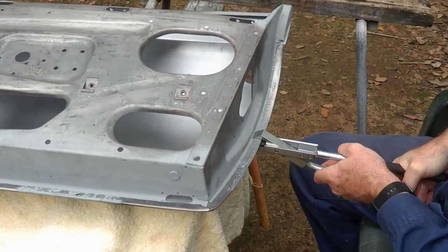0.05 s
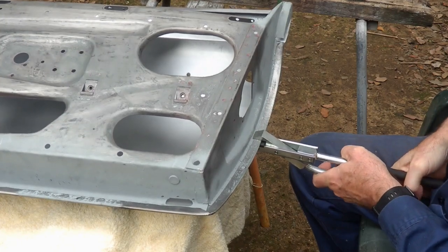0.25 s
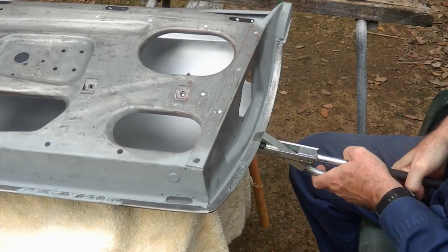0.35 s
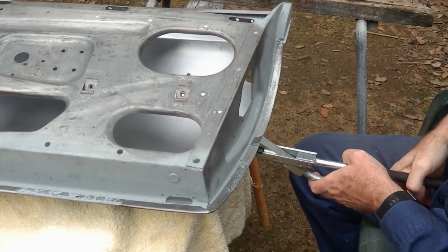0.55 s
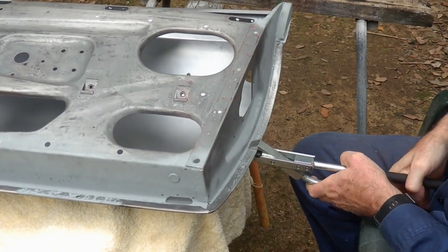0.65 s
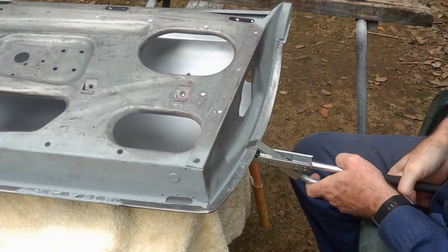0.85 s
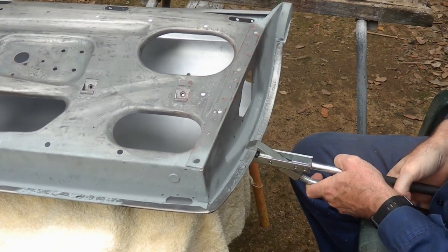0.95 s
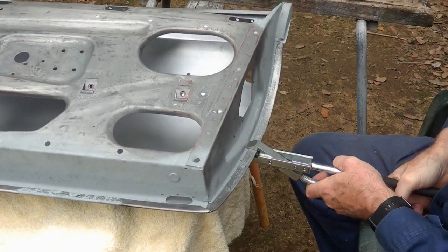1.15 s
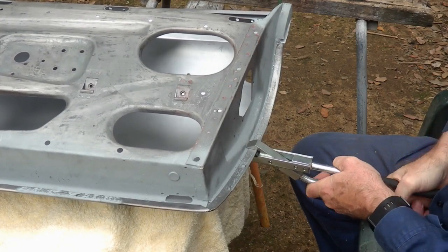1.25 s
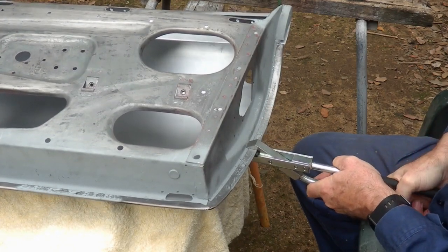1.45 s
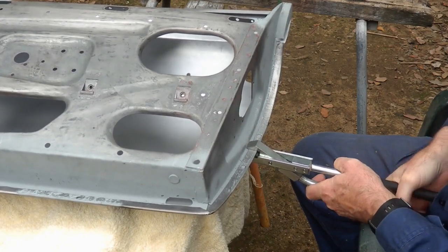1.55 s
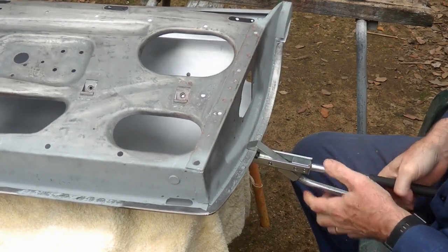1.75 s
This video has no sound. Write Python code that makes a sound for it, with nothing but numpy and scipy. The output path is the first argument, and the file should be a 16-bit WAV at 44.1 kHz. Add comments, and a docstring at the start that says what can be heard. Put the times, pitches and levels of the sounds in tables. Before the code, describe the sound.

Hollow sheet metal creaks, knocks and rings under gripping jaws, ending in a sharp clank and click

```python
"""A hand flanging tool is squeezed on the edge of a steel car door.
The edge yields in stick-slip jerks: each one knocks the flange and rings the hollow panel's modes, mostly ever harder.
The jaws scrape in tiny noisy slips, then snap off with a clank and the tool clicks open; the door booms softly.
Behind it lie a low outdoor rumble, a faint hiss and a thin high whine, made of noise bands and one sine."""
import sys
import numpy as np
from scipy import signal
from scipy.fft import rfft, irfft, next_fast_len
from scipy.io import wavfile

SR = 44100
rng = np.random.default_rng(int(sys.argv[2]) if len(sys.argv) > 2 else 0)


def dump_mix(stems):
    """Bounce the given channels to the path in sys.argv[1] as a 16-bit WAV at rate SR."""
    frames = np.atleast_2d(stems).T  # one column per channel
    limited = np.clip(frames, -1, 1)  # hard clip at full scale
    pcm = np.round(limited * 32767).astype(np.int16)
    wavfile.write(sys.argv[1], SR, pcm)


N = 79380
T = np.arange(N) / SR  # time in seconds


def undb(db):
    """Turn decibels into gain."""
    return 10 ** (np.asarray(db) / 20)


def unit(x):
    """Scale to an rms of 1."""
    return x / np.sqrt(np.mean(x ** 2))


def at(table, hz, axis=1):
    """Read one column of a table between its rows, on a log-frequency axis."""
    rows = np.array(table, float)
    return np.interp(np.log(hz), np.log(rows[:, 0]), rows[:, axis])


def pan(db):
    """Left and right gains for a left-minus-right level difference."""
    gains = np.array([[undb(db / 2)], [undb(-db / 2)]])
    return unit(gains)


def fade(age, t60, rise):
    """Quick rise, then a decay of 60 dB in t60 seconds; silent before age 0."""
    age = np.maximum(age, 0)
    return (1 - np.exp(-age / rise)) * np.exp(-np.log(1000) * age / t60)


def bump(hz, octaves):
    """Spectrum of one broad resonance; its gain is halved this many octaves away."""
    freqs = np.maximum(np.fft.rfftfreq(N, 1 / SR), 1)
    return 1 / (1 + (np.log2(freqs / hz) / octaves) ** 2)


BANDS_HZ = 22 * 2 ** (np.arange(39) / 4)  # band centres, four per octave
CLUSTER_HZ = 17  # spacing of the random peaks and dips in an uneven spectrum


def bands(stereo, grains=1, uneven_db=0):
    """Split stereo noise into bands, each with its own width and balance, optionally bunched into peaks."""
    size = next_fast_len(N)
    freqs = np.maximum(np.fft.rfftfreq(size, 1 / SR), 1)
    peaks = np.interp(freqs / CLUSTER_HZ, np.arange(2048), rng.uniform(-1, 1, size=2048))
    noise = rng.standard_normal((2, N)) * grains
    spectra = rfft(noise, size) * undb(uneven_db * np.sqrt(3) * peaks)
    for hz in BANDS_HZ:
        # neighbouring bands overlap and cross-fade in power
        distance = np.minimum(abs(np.log2(freqs / hz)) * 4, 1)
        mid, side = irfft(spectra * np.sqrt(1 - distance), size)[:, :N]
        side = side * undb(at(stereo, hz))
        left_right = np.array([mid + side, mid - side])
        yield hz, unit(left_right) * pan(at(stereo, hz, axis=2))


# How loud the surroundings are from low to high pitch.
# Each row: frequency in Hz, level in dB per band before the wavering.
AIR_LEVELS = [(22, -102), (40, -67.5), (58, -63), (80, -66.5), (115, -58.5), (200, -66), (320, -73.5),
              (600, -70.5), (1200, -78.5), (2400, -87), (3700, -95), (5000, -83), (6800, -73), (10000, -72),
              (15000, -67.5)]
# How wide the surroundings sound.
# Each row: frequency in Hz, side level against the middle in dB, left minus right in dB.
AIR_STEREO = [(58.6, -16, 1.7), (560, -6, 1.5), (2460, 2, 0), (7500, 4, 0.8), (14000, -10, 0)]
AIR_WAVER_DB = 4.26  # typical wavering at the lowest pitches
WHINE_HZ, WHINE_DB = 15735, -71


def background():
    """Noise bands make a wavering low rumble and a steadier hiss; a sine adds a thin high whine."""
    out = np.zeros((2, N))
    knots = np.linspace(0, T[-1], 20)
    for hz, noise in bands(AIR_STEREO):
        depth_db = AIR_WAVER_DB / (1 + hz / 2000)  # high bands waver less
        waver_db = np.interp(T, knots, rng.standard_normal(len(knots))) * depth_db
        out += noise * undb(at(AIR_LEVELS, hz) + waver_db)
    whine = np.sqrt(2) * np.sin(2 * np.pi * WHINE_HZ * T)
    return out + undb(WHINE_DB) * whine


# Low booming of the door as it flexes under the tool.
# Each row: time in seconds, level in dB.
FLEX_LEVELS = [(0, -42.5), (.18, -113), (.3, -52), (.45, -57), (.58, -48), (.8, -44), (1.0, -55.5),
               (1.2, -54.5), (1.4, -79), (1.55, -62), (1.68, -52.5), (1.8, -44)]
FLEX_HZ, FLEX_OCTAVES = 264.5, 0.5


def flexing():
    """The hollow door booms softly as the tool levers against it: noise through a low resonance."""
    spectrum = rfft(rng.standard_normal(N)) * bump(FLEX_HZ, FLEX_OCTAVES) ** 2
    boom = unit(irfft(spectrum, N))
    level_db = np.interp(T, *np.array(FLEX_LEVELS).T)
    return boom * undb(level_db) * pan(db=2.6)


# How hard the jaws rub on the edge.
# Each row: time in seconds, pressure in dB.
RUB_PRESSURE = [(0, -11.5), (.18, -7), (.25, 3.5), (.32, -4), (.41, 1), (.52, -1.5), (.62, 2.5), (.74, 6),
                (.8, -0.5), (.95, -2), (1.08, -13), (1.55, -14), (1.7, -5.5), (1.8, 1)]
# Colour of the rubbing.
# Each row: frequency in Hz, level in dB per band before the pressure is added.
RUB_COLOUR = [(100, -67), (280, -60), (700, -63.5), (1300, -74.5), (3500, -82), (5500, -76.5), (7600, -65),
              (10500, -78.5), (15000, -83)]
# How wide the rubbing, and later the ringing panel, sound.
# Each row: frequency in Hz, side level against the middle in dB, left minus right in dB.
PANEL_STEREO = [(98, -20, 2.1), (570, -20, 0.9), (1320, -7, 0), (2520, -4, -1), (4900, 0.5, 1),
                (8000, 0, 4.5), (14100, -30, -6)]
GRAINS_PER_S, GRAIN_SPREAD_DB = 550, 0.5


def rubbing():
    """Tiny slips under the jaws make a gritty scrape that follows the pressure."""
    slips = rng.random(N) < GRAINS_PER_S / SR
    grains = slips * undb(GRAIN_SPREAD_DB * rng.standard_normal(N))
    # the power of each tiny slip dies away over about 2 ms
    keep = np.exp(-1 / (SR * 0.002))
    grains = np.sqrt(signal.lfilter([1], [1, -keep], grains ** 2))
    scrape = np.zeros((2, N))
    for hz, noise in bands(PANEL_STEREO, grains):
        scrape += noise * undb(at(RUB_COLOUR, hz))
    return scrape * undb(np.interp(T, *np.array(RUB_PRESSURE).T))


def strike(starts, sizes, response):
    """Repeat one response at the given times and strengths."""
    out = np.zeros(N)
    for start, size in zip(starts, sizes):
        i = int(start * SR)
        out[i:] += size * response[:N - i]
    return out


# Steel-on-steel clicks of the tool.
# Each row: start in seconds, level in dB, centre in Hz, distance to half gain in octaves,
# time to fall by 60 dB in seconds, left minus right in dB.
CLICKS = [(.488, -41.5, 7400, .2, 0.015, 1), (0.628, -44.5, 7340, 0.29, 0.35, 9),
          (0.8309, -35, 6260, 0.22, 0.03, 0), (.837, -33.5, 4940, 0.23, 0.12, 1),
          (0.843, -49, 4540, 0.21, 0.24, 14), (0.9026, -39, 9000, 0.1, .13, 3),
          (1.312, -34, 6940, 0.22, 0.032, 3), (1.312, -39, 13000, 0.46, 0.017, -2),
          (1.314, -37, 7340, 0.31, 0.15, 4.5), (1.314, -55, 2500, 1, 0.2, -3.5),
          (1.324, -38.5, 7440, 0.064, 0.047, 19), (1.565, -53.5, 8500, 0.62, .025, -4),
          (1.745, -58.5, 6100, 0.09, .08, 5)]
# Ring of the tool's steel after every click.
# Each row: frequency in Hz, level against the click in dB, time to fall by 60 dB in seconds.
TOOL_MODES = [(7200, -20, 0.22), (7400, -22, 0.13), (7740, -11, 0.087)]


def tool():
    """Jaws and linkage click: a bright noise burst, with a thin steel ring of decaying sines."""
    out = np.zeros((2, N))
    for start, db, hz, width, t60, pan_db in CLICKS:
        spectrum = rfft(rng.standard_normal((2, N))) * bump(hz, width)
        burst = unit(irfft(spectrum, N))
        out += burst * fade(T - start, t60, rise=0.0004) * undb(db) * pan(pan_db)
    starts = [row[0] for row in CLICKS]
    sizes = [undb(row[1]) for row in CLICKS]
    for hz, db, t60 in TOOL_MODES:
        ring = np.sin(2 * np.pi * hz * T) * fade(T, t60, rise=0.00015) * undb(db)
        out += strike(starts, sizes, ring) * pan(db=8)
    return out


# The four frequencies in Hz where the force of a jerk is given: thud, body, clang, crack.
SLIP_HZ = [220, 650, 2000, 7000]


def force(colour_db, hz):
    """How hard a jerk drives the door at a frequency."""
    return undb(np.interp(np.log(hz), np.log(SLIP_HZ), colour_db))


# Jerks of the edge, which drive both the flange and the panel.
# Each row: start in seconds, then force in dB of the thud, the body, the clang and the crack.
SLIPS = [(.215, -27, -44, -83, -60), (0.223, -53, -39.5, -52.5, -88), (.377, -43, -45, -82, -75),
         (.4075, -37.5, -37, -65, -61), (.443, -49, -49, -70, -60), (.4695, -34, -32, -63, -60),
         (.5605, -33, -31.5, -60, -62), (.638, -32, -27, -42, -64), (.6655, -31.5, -20.5, -44.5, -47),
         (0.71, -28, -38.5, -47, -43.5), (.720, -41, -27, -58, -74), (.833, -40.5, -33.5, -47, -40),
         (0.8541, -42.5, -33, -31, -33), (.859, -34, -22.5, -52, -59), (.885, -24.5, -45.5, -85, -46),
         (1.780, -58, -40.5, -83, -81)]
SLIP_STARTS = [row[0] for row in SLIPS]
KNOCK_HZ, KNOCK_T60_S, KNOCK_DB = 500, 0.03, 9  # level against the force


def flange():
    """The heavily damped flange under the jaws answers each jerk with a short, hard knock."""
    knock = np.sin(2 * np.pi * KNOCK_HZ * T) * fade(T, KNOCK_T60_S, rise=0.0006)
    sizes = [force(row[1:], KNOCK_HZ) for row in SLIPS]
    return strike(SLIP_STARTS, sizes, knock) * undb(KNOCK_DB) * pan(db=1.8)


# Clear ringing tones (modes) of the door panel.
# Each row: frequency in Hz, relative level in dB, time to fall by 60 dB in seconds.
PANEL_MODES = [(180.2, -13, 0.34), (210.7, -4, 0.28), (241.6, -5, 0.25), (275.5, -3, 0.37),
               (331.1, -5.5, 0.55), (412.5, -8, 0.96), (419.5, -11.5, 0.35), (443.6, -7.5, 0.54),
               (553.6, -12.5, 0.58), (573, -9.5, 0.42), (699.2, -6, 0.26), (724.4, -5.5, 0.26),
               (770, -14.5, 0.25), (875, -5, 0.26), (910, -12.5, 0.42), (1037, -8.5, 0.23),
               (1117, -5, 0.14), (1233, -4.5, 0.21), (1503, -5, 0.17), (1617, -5.5, 0.2),
               (1671, -6.5, 0.23), (1870, -15, 0.17), (2703, -12, 0.22), (2756, -11, 0.24),
               (3176, -17, 0.33), (4615, -7.5, 0.19)]
MODES_DB, MODE_RISE_S = -3.5, 0.001  # the level is added to every mode
# Wash of the panel's modes that lie too close together to hear one by one.
# Each row: frequency in Hz, relative level in dB per band, time to fall by 60 dB in seconds.
WASH = [(90, -46, 0.11), (206, -10, 0.18), (446, -8, 0.42), (626, -11, 0.2), (824, -2, 0.19),
        (1020, -15, 0.39), (1400, -10, 0.26), (2040, -5.5, 0.22), (3700, -10, 0.26), (4900, -6, .2),
        (8000, 1, 0.088), (10600, -15, 0.16), (15000, -22, 0.098)]
WASH_DB, WASH_RISE_S = -4, 0.0009  # the level is added to every band
STRIKE_DB, STRIKE_T60_S = -12, 0.024  # brief bang of each jerk, level against the wash
CLUSTER_DB = 3.5  # unevenness of the crowded modes


def panel():
    """Each jerk rings the door's clear modes as sines and its crowded ones as a wash of noise."""
    out = np.zeros((2, N))
    for k, (hz, db, t60) in enumerate(PANEL_MODES):
        sign = (-1) ** k  # every other mode starts the opposite way
        ring = sign * np.sin(2 * np.pi * hz * T) * fade(T, t60, MODE_RISE_S)
        sizes = [force(row[1:], hz) for row in SLIPS]
        rings = strike(SLIP_STARTS, sizes, ring)
        out += rings * undb(db + MODES_DB) * pan(at(PANEL_STEREO, hz, axis=2))
    bang = undb(STRIKE_DB) * fade(T, STRIKE_T60_S, rise=0.00018)
    for hz, noise in bands(PANEL_STEREO, uneven_db=CLUSTER_DB):
        decay = fade(T, at(WASH, hz, axis=2), WASH_RISE_S) + bang
        # overlapping jerks add up in power
        powers = [force(row[1:], hz) ** 2 for row in SLIPS]
        power = strike(SLIP_STARTS, powers, decay ** 2)
        out += noise * np.sqrt(power) * undb(at(WASH, hz) + WASH_DB)
    return out


def scene():
    """Surroundings, tool and door together."""
    return background() + flexing() + rubbing() + tool() + flange() + panel()


def record(dry):
    """The recorder cuts the top: a steep low-pass filter at 16 kHz."""
    low_pass = signal.ellip(10, 0.2, 80, 16000, fs=SR, output="sos")
    return signal.sosfilt(low_pass, dry)


dry = scene()
out = record(dry)
dump_mix(out)
```